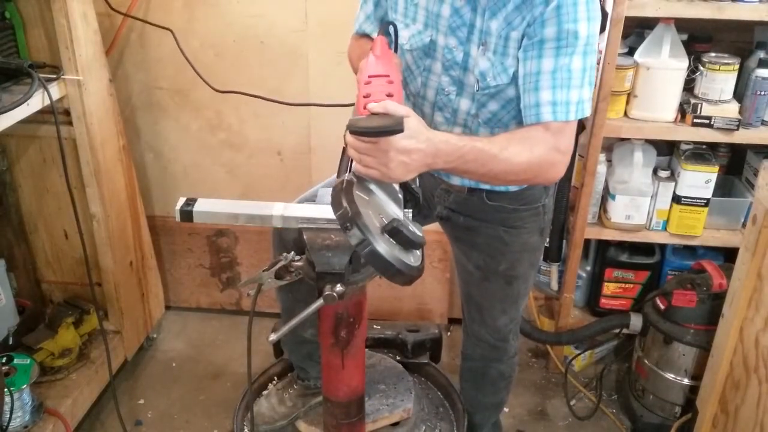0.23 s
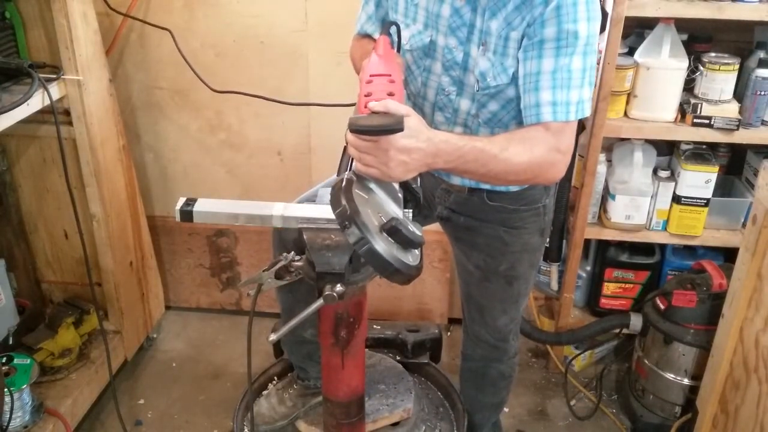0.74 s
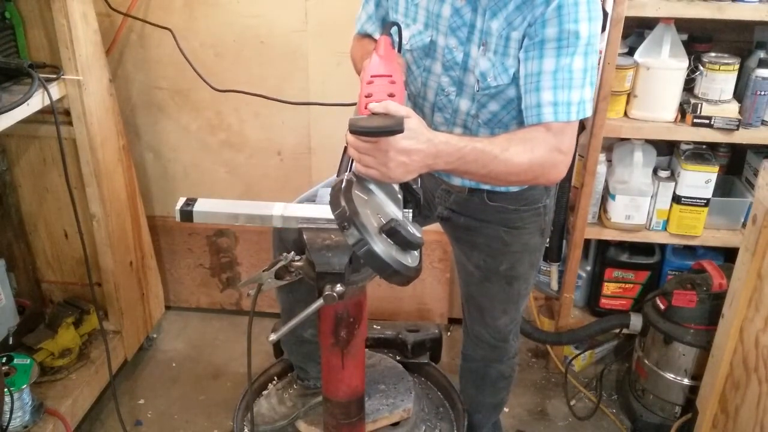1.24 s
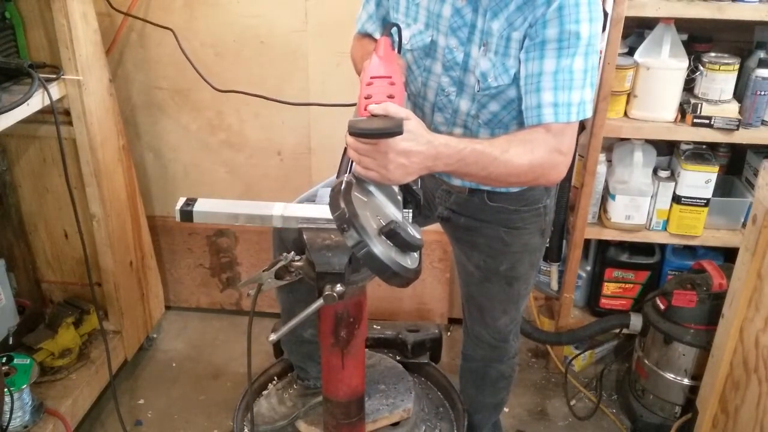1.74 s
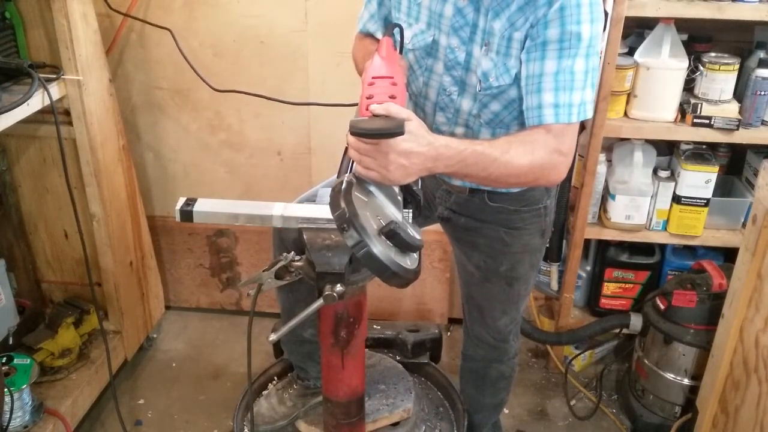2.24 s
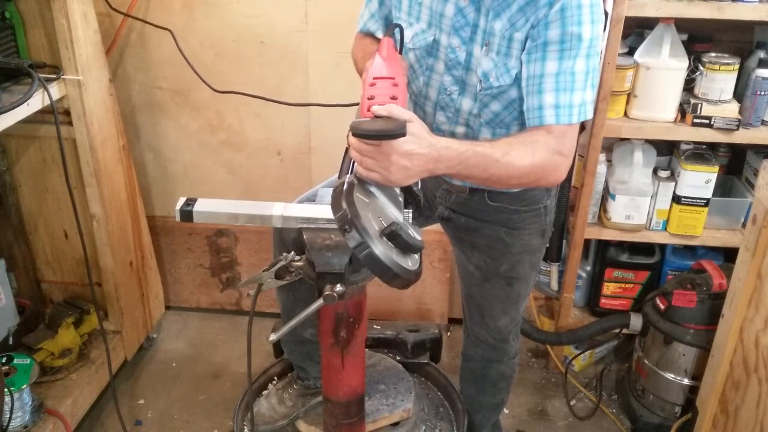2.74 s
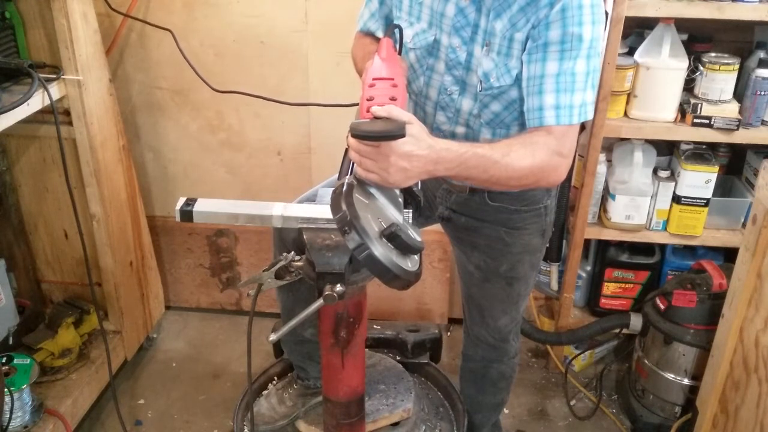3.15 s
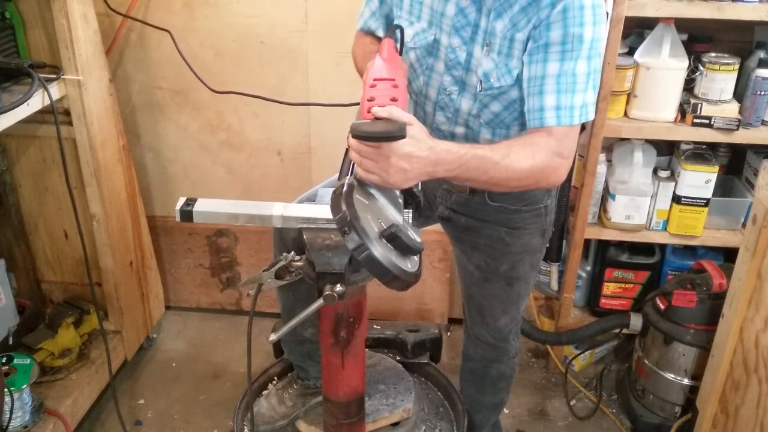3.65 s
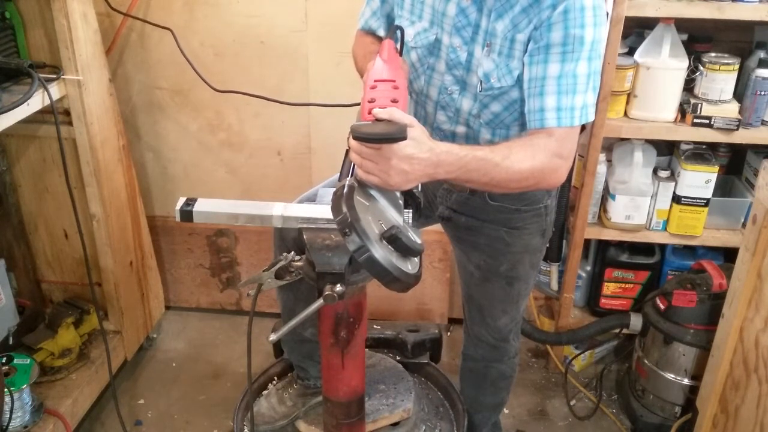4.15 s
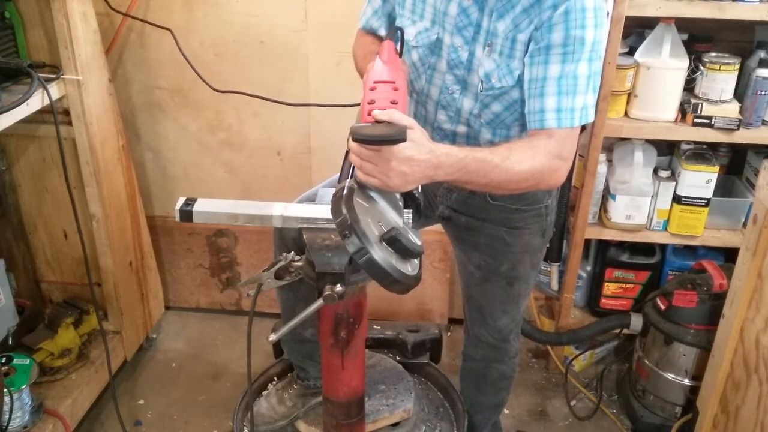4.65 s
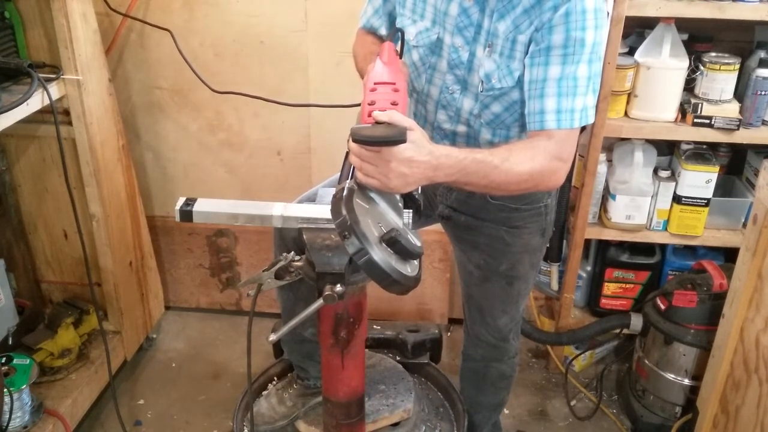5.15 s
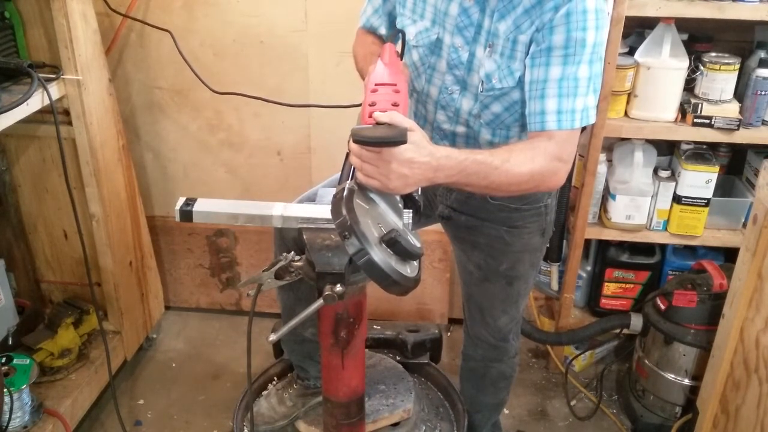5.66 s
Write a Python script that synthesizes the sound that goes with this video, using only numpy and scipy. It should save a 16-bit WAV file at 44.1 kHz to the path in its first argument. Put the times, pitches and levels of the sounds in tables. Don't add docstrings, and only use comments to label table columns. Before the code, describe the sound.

A handheld electric bandsaw whirs freely, then bites into thin sheet metal, its motor sagging as a harsh ringing whine takes over in a small workshop.

```python
import sys
import numpy as np
from scipy import signal
from scipy.fft import rfft, irfft, next_fast_len
from scipy.io import wavfile
from scipy.ndimage import uniform_filter1d, minimum_filter1d

SR = 44100
rng = np.random.default_rng(int(sys.argv[2]) if len(sys.argv) > 2 else 0)


def wav_record(signal):
    frames = np.transpose(np.atleast_2d(signal))
    bounded = np.clip(frames, -1, 1)
    quanta = np.round(bounded * 32767).astype(np.int16)
    wavfile.write(sys.argv[1], SR, quanta)


def amplitude_ratio(level_db):
    exponent = np.asarray(level_db, float) / 20
    return 10 ** exponent


N = 259749
PAD = next_fast_len(N + SR)
HZ = np.arange(PAD // 2 + 1) * SR / PAD + 1e-3


def teeth(turns, wheel_slip, wave, bite_db, overtone_db):
    # frequency in Hz, level in dB.
    bite_colour = [(300, -50), (900, -30), (1300, 7), (1700, 2.5), (2300, 7), (3200, 4.5), (4200, 2),
                   (5000, -7), (5600, -8), (7000, -20)]
    teeth_per_turn, teeth_per_wave, turns_per_throb = 5.28, 15.5, 15.2
    wander = .18 * drift(14) + .045 * drift(110)
    tooth = 2 * np.pi * (teeth_per_turn * turns + wander)
    tooth = tooth + wave * np.sin(tooth / teeth_per_wave)
    throb_db = 3.5 * np.sin(2 * np.pi * turns / turns_per_throb + wheel_slip)
    push_db = bite_db - 10.5 + 3.5 * drift(116) + throb_db
    push = amplitude_ratio(push_db) * np.cos(tooth)

    tooth = tooth + .17 * drift(126)
    edge = np.cos(2 * tooth) + amplitude_ratio(4.0) * np.cos(3 * tooth) + amplitude_ratio(-12) * np.cos(4 * tooth)
    edge_db = overtone_db - 7.0 + 2.3 * drift(220) + 1.0 * drift(29) + 0.45 * throb_db
    blows = push + amplitude_ratio(edge_db) * edge
    return irfft(rfft(blows, PAD) * amplitude_ratio(at_hz(bite_colour)), PAD)[:N]


def chips(level_db):
    # frequency in Hz, level in dB per Hz.
    chip_colour = [(300, -60), (1000, 8), (2000, 10.5), (3200, 20.5), (5000, 18), (6500, 6), (9000, 3.5),
                   (11500, -7), (13000, -9.5), (15800, -10.5)]
    grains = rng.standard_normal((2, N)) * amplitude_ratio(1.5 * drift(1250))
    return amplitude_ratio(level_db + 9.5) * [shaped(path, chip_colour) for path in grains]


def roar(level_db):
    # frequency in Hz, level in dB per Hz.
    roar_colour = [(100, -60), (200, -45), (358, -31.5), (454, -30), (585, -12), (850, -13), (1100, -5),
                   (1590, -9), (2200, -7.5), (2960, -5), (4330, -10), (5500, -14.5), (7000, -21),
                   (11500, -34), (16000, -44)]
    flicker_db = 0.64 * drift(18)
    noise = [shaped(white, roar_colour) for white in rng.standard_normal((2, N))]
    return amplitude_ratio(level_db + 10.5 + flicker_db) * noise


def rotor_tones(turns, turns_hz):
    # cycles per turn, level in dB away from any housing resonance.
    main_orders = [(1, -68), (2, -58.5), (3, -55), (18, -48.5)]
    # cycles per turn, level in dB against the once-a-turn tone.
    weak_orders = [(12, 16.5)]
    orders = [(k, db + housing_db(k * turns_hz)) for k, db in main_orders]
    once_a_turn_db = orders[0][1]
    orders += [(k, once_a_turn_db + db) for k, db in weak_orders]
    tones = 0
    for k, db in orders:
        waver_db = 0.92 * np.sqrt(k) * drift(24)
        tones = tones + np.sqrt(2) * amplitude_ratio(db + waver_db) * np.sin(2 * np.pi * k * turns)
    return tones


def housing_db(tone_hz):
    # frequency in Hz, width in Hz, lift in dB.
    housing = [(298, 8, 8), (319, 16, 10), (364, 16, 15), (690, 30, 16), (728, 16, 14), (926, 28, 16),
               (975, 22, 21), (1004, 18, 17), (1088, 28, 30), (5590, 170, 9), (5950, 340, 12),
               (6420, 300, 8)]
    grid = np.arange(200., 7000)
    lift_db = sum(lift / (1 + (2 * (grid - hz) / width) ** 4) for hz, width, lift in housing)
    return np.interp(tone_hz, grid, lift_db)


def workshop(paths):
    # frequency in Hz, width in Hz, left lift in dB, right lift in dB.
    body = [(459, 18, 2, 2), (543, 14, -24, -19), (553, 85, 5, 3), (610.6, 23, -8.5, -8),
            (771, 18, -5, -17), (820.4, 19, 7.5, 9.5), (914, 37, -8.5, -6), (940, 36, 4.5, 10.5),
            (1119, 46, -13, -1.5), (1301, 19, 5.5, -11), (1426, 67, 3, 9.5)]
    room_modes = [(1538, 30, 4, 2), (1594, 25, 6, 9), (1648, 25, 8, 6), (1757, 22, 7, 3), (1812, 30, 4, 5),
                  (1950, 20, 4, 3), (2436, 11.3, -1.5, 9.5), (2905, 160, 3, 2), (3070, 35, 5, 4),
                  (3135, 25, 3, 2), (3197, 30, 6, 5), (3293, 30, 4, 3)]
    guard = [(4050, 180, 4, 4.5), (4710, 34, -18, 14.5), (4850, 130, -5.5, 8), (5070, 102, 4.5, 5)]
    # frequency in Hz, difference in dB.
    left_over_right = [(60, -4), (110, -9), (200, 2), (380, 1), (700, 1.5), (1290, 10), (2380, 3),
                       (4400, 6), (8120, -1.5), (15000, -15.5)]
    echo_s, echo, echo_cut_hz = .0100, .5, 1000
    comb = 1 + echo * np.exp(-2j * np.pi * HZ * echo_s) / (1 + (HZ / echo_cut_hz) ** 4)

    fade_60db_s, wet_db = .3, -13
    tail_s = np.arange(SR // 2) / SR
    tails = rng.standard_normal((2, SR // 2)) * amplitude_ratio(-60 * tail_s / fade_60db_s)
    room = 1 + amplitude_ratio(wet_db) * rfft(tails, PAD) / np.linalg.norm(tails[0])

    ring_db = 0
    for hz, width, left, right in body + room_modes + guard:
        ring_db = ring_db + np.outer([left, right], 1 / (1 + (2 * (HZ - hz) / width) ** 2))
    side_db = np.outer([.5, -.5], at_hz(left_over_right))
    return irfft(two_ears(*paths) * comb * room * amplitude_ratio(ring_db + side_db), PAD)[:, :N]


def two_ears(mid, side):
    # frequency in Hz, left-right likeness from 0 to 1, phase by which the left leads in radians.
    likeness = [(130, .8, 0), (290, .9, 0), (640, .8, .2), (1100, .62, 1.4), (2000, .55, 1.2),
                (4000, .25, 1.4), (8000, .1, 1.5)]
    alike = np.clip(at_hz(likeness), 0, .98)
    lead = np.exp(1j * np.outer([.5, -.5], at_hz(likeness, column=2)))
    shared = np.sqrt(1 + alike) * rfft(mid, PAD)
    apart = np.sqrt(1 - alike) * rfft(side, PAD) * [[1], [-1]]
    return lead * (shared + apart)


def rumble():
    # middle in seconds, length in seconds, gain in dB.
    shakes = [
        (1.7, .5, 5),
        (2.9, .4, 3),
        (3.3, 0.32, 6),
        (4.85, .1, 7),
        (5.65, 0.54, 7),
    ]
    colour = [(20, 8), (60, -12), (110, -1.0), (200, -2.0), (280, -9), (400, -46)]   # Hz, dB
    shared, left, right = [shaped(white, colour) for white in rng.standard_normal((3, N))]
    ears = shared * amplitude_ratio(np.array([[2.5], [-2.5]])) + .45 * np.array([left, right])
    level_db = -69.5 - 1.5 + 2.2 * drift(6) + swells(*np.transpose(shakes))
    return amplitude_ratio(level_db) * ears


def rms_one(x):
    return x / np.sqrt(np.mean(x ** 2) + 1e-20)


def in_time(rows):
    s, *columns = np.transpose(rows)
    return [np.interp(np.arange(N) / SR, s, c) for c in columns]


def at_hz(points, column=1):
    points = np.array(points)
    return np.interp(np.log(HZ), np.log(points[:, 0]), points[:, column])


def shaped(x, points):
    return rms_one(irfft(rfft(x, PAD) * amplitude_ratio(at_hz(points)), PAD)[:N])


def drift(rate_hz):
    r = np.exp(-2 * np.pi * rate_hz / SR)
    smooth = signal.lfilter([1], [1, -2 * r, r * r], rng.standard_normal(N + SR))
    return rms_one(smooth[SR:])


def swells(s, length_s, db):
    t = np.arange(0, N / SR, .002)
    bells = np.exp(-(2 * (t - s[:, None]) / length_s[:, None]) ** 2)
    return np.interp(np.arange(N) / SR, t, np.dot(db, bells))


def scene():
    # time in seconds, turns per second in Hz.
    rotor = [(0, 360.3), (.5, 363.3), (1.2, 365.8), (1.6, 363.7), (1.9, 351.1), (2.1, 336.3), (2.27, 330.4),
             (2.45, 333.2), (2.7, 326), (3.0, 322.6), (3.15, 323.5), (3.3, 315.8), (3.5, 311.6),
             (3.78, 316.6), (4.2, 307.5), (4.8, 300.4), (5.55, 301), (5.89, 293.5)]
    # time in seconds, share from 0 to 1.
    blade_in = [
        (0, 0.03),
        (1.5, 0),
        (1.62, 0.34),
        (1.8, 0.58),
        (1.9, 0.8),
        (2.05, 0.96),
        (5.89, 0.88),
    ]
    # time in seconds, level in dB.
    feed = [
        (0, 0),
        (1.6, 5.5),
        (2.0, -1.5),
        (2.5, -3),
        (3.0, 0),
        (3.7, -0.5),
        (4.3, 0),
        (4.7, 1.5),
        (5.3, 4),
        (5.89, 5.5),
    ]
    # time in seconds, swing in radians.
    set_wave = [
        (0, .3),
        (1.9, .35),
        (2.15, .85),
        (3.1, .95),
        (3.4, .75),
        (4.4, .65),
        (4.8, .45),
        (5.89, .45),
    ]
    # middle and length in seconds, bite and overtone gain in dB.
    grabs = [(1.665, .05, 17, 7), (1.745, 0.12, 6.5, 5), (1.896, 0.14, 9.5, 1), (1.96, 0.061, -5.5, 8),
             (2.04, 0.15, 13.5, 2), (2.235, 0.19, 12.5, 3), (2.498, 0.23, 16.5, 6), (2.7, 0.12, 8, 1),
             (2.62, 0.075, -1, 5.5), (2.812, 0.092, 6.5, 4), (2.924, 0.032, 14.5, 11),
             (3.13, 0.034, 1, 6.5), (3.166, 0.054, 7, 2.5), (3.28, 0.091, 8.5, 3), (3.366, 0.044, 10, 3.5),
             (3.494, 0.13, 11.5, 3.5), (3.824, 0.052, 8, 4.5), (3.93, .12, -2, 1), (4.1, 0.16, 6.5, 4.5),
             (4.358, 0.05, 13.5, -4), (4.485, .04, 0, 3), (5.086, 0.041, -0.5, -1), (5.25, 0.051, 0, -2),
             (5.653, 0.029, -10, 0.5), (5.86, 0.058, 1, 2.5)]
    # middle in seconds, length in seconds, loss in dB.
    gaps = [
        (2.695, 0.042, 8),
        (2.82, .07, 0.5),
        (2.974, 0.14, 4),
        (3.345, .05, 4),
        (3.617, 0.13, 3.5),
        (3.865, 0.089, 2),
        (4.154, 0.063, 2),
        (4.283, .05, 2),
    ]
    turns_hz, feed_db = in_time(rotor)[0], in_time(feed)[0]
    turns = np.cumsum(turns_hz + .7 * drift(12)) / SR
    contact = np.clip(in_time(blade_in)[0], 0, 1)
    s, length_s, grab_db, sharp_db = np.transpose(grabs)
    grab_db, sharp_db = swells(s, length_s, grab_db), swells(s, length_s, sharp_db)

    free_db, loaded_db = -29, -38
    roar_db = free_db + (loaded_db - free_db) * contact ** 1.76
    bite_db = -22.5 + 0.73 * feed_db + grab_db
    overtone_db = -22.5 + feed_db + sharp_db
    hiss_db = -35.5 + 0.96 * feed_db + 0.21 * grab_db - swells(*np.transpose(gaps))

    wheel_slip = .7 * drift(4)
    wave = in_time(set_wave)[0]
    bite = [teeth(turns, wheel_slip, wave, bite_db, overtone_db) for path in range(2)]
    saw = roar(roar_db) + contact * (bite + chips(hiss_db))
    tones = rotor_tones(turns, turns_hz) * amplitude_ratio(np.array([[2.5], [-2.5]]))
    return workshop(saw) + tones + rumble()


def low_pass(x):
    return signal.sosfilt(signal.butter(12, 16460, fs=SR, output="sos"), x)


def record(dry):
    ceiling, top_hz = .96, 15900
    over = np.maximum(np.abs(dry).max(axis=0) / ceiling, 1)
    gain = uniform_filter1d(minimum_filter1d(1 / over, size=801), size=401)
    gain = uniform_filter1d(gain, size=401)
    mix = irfft(rfft(dry * gain, PAD) * (HZ < top_hz), PAD)[:, :N]
    return low_pass(mix)


dry = scene()
out = record(dry)
wav_record(out)
```